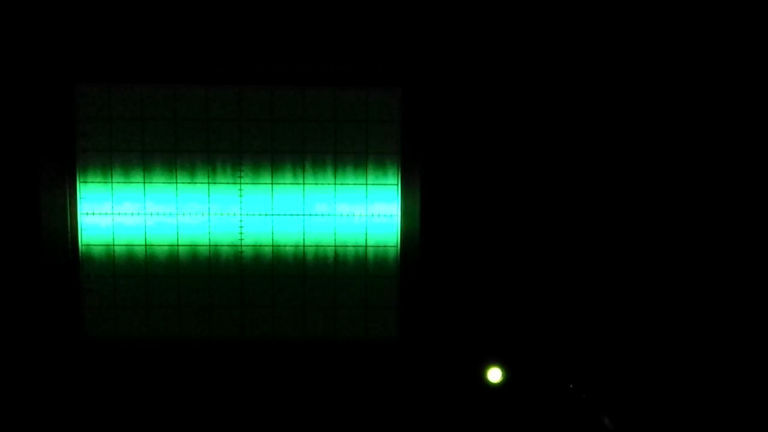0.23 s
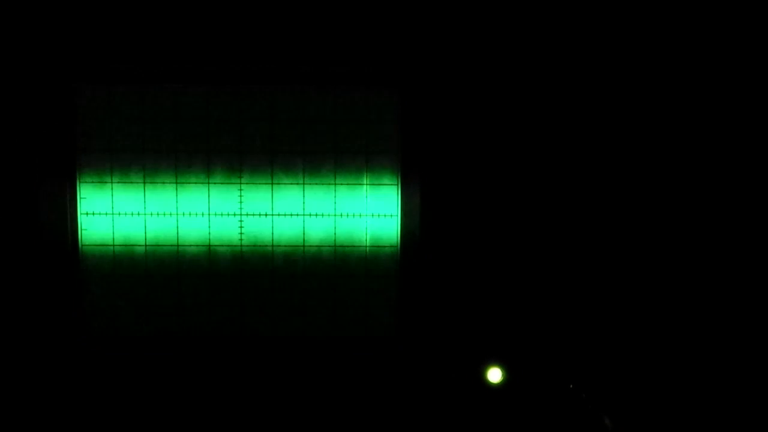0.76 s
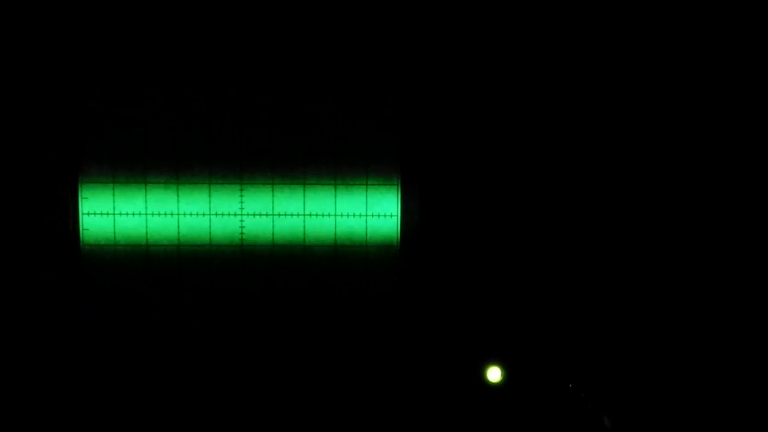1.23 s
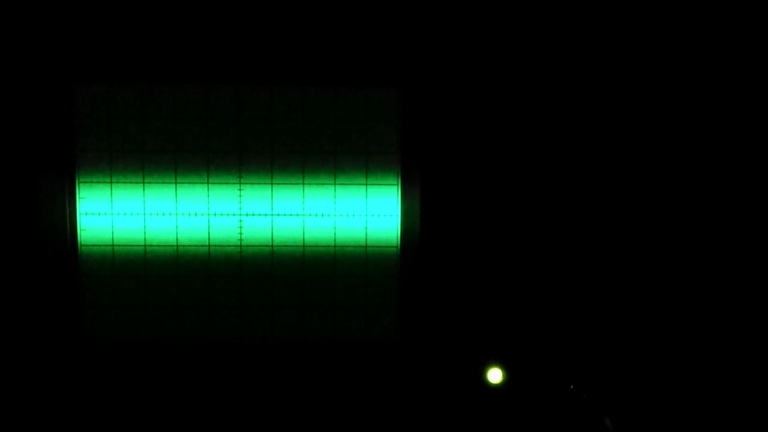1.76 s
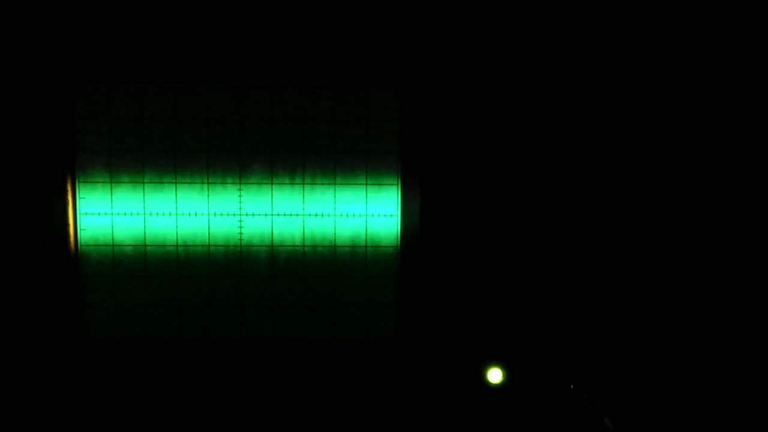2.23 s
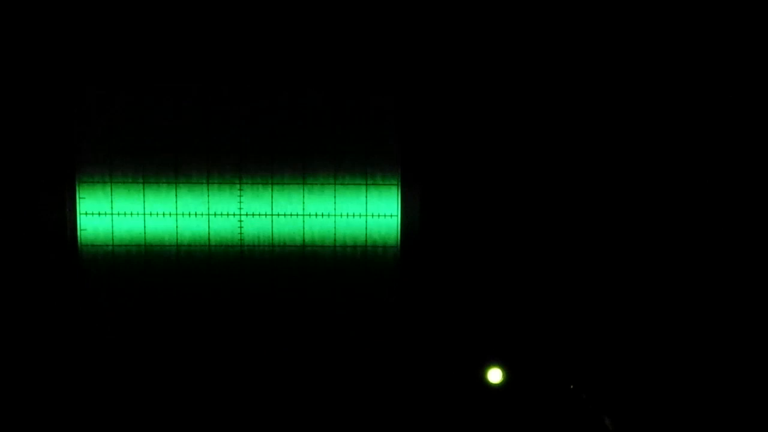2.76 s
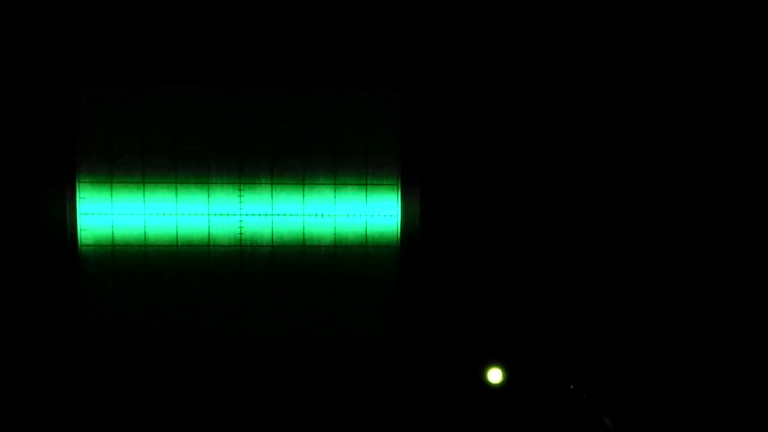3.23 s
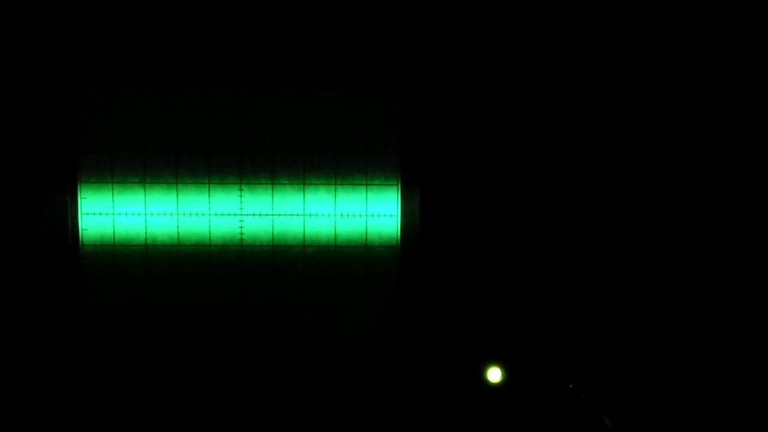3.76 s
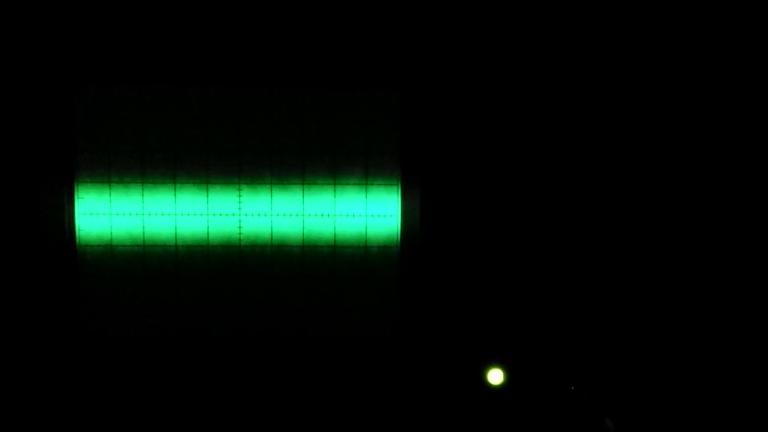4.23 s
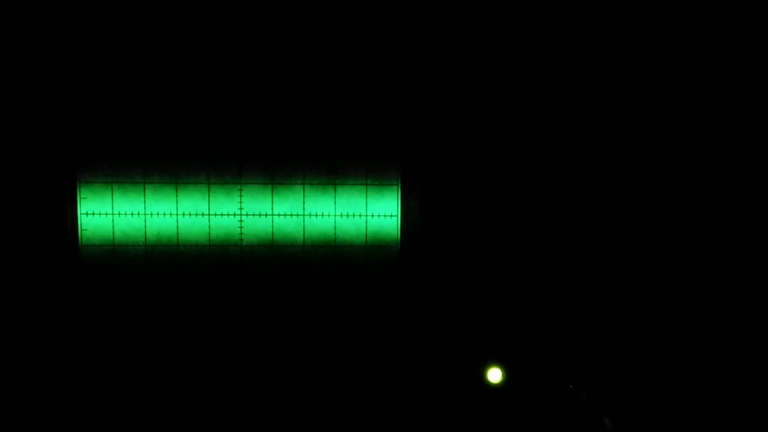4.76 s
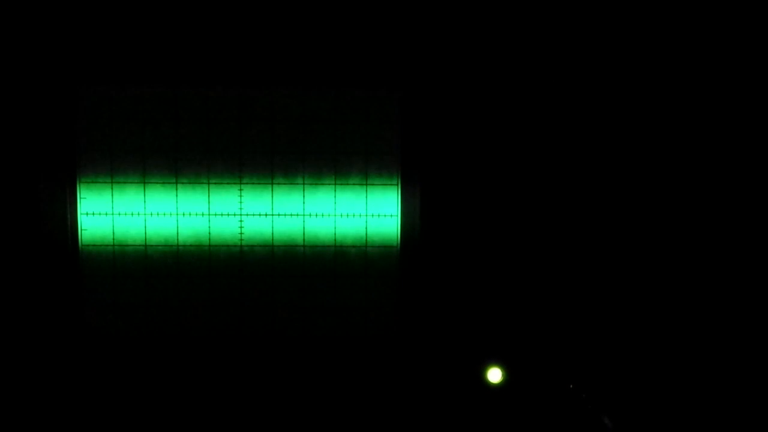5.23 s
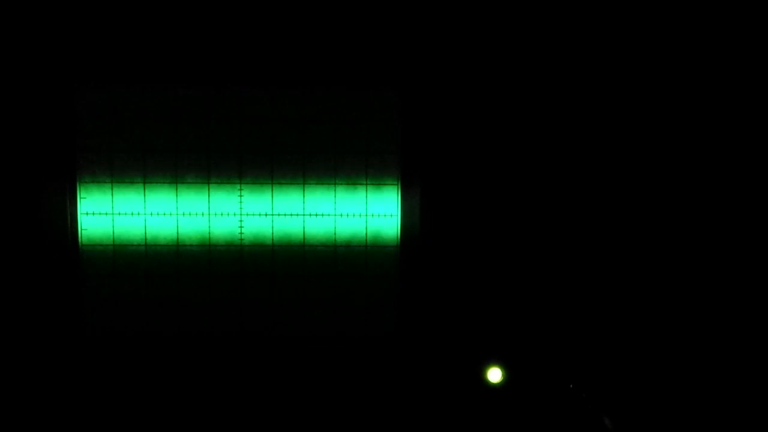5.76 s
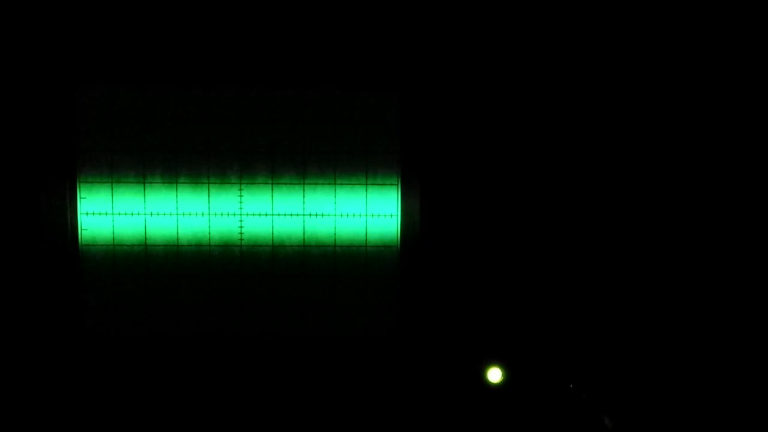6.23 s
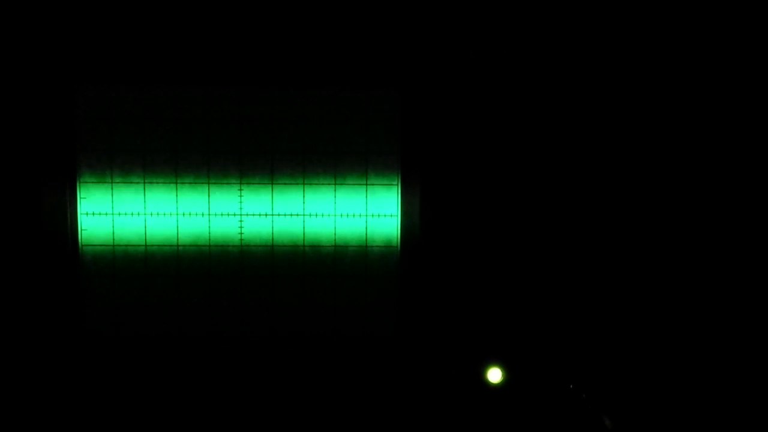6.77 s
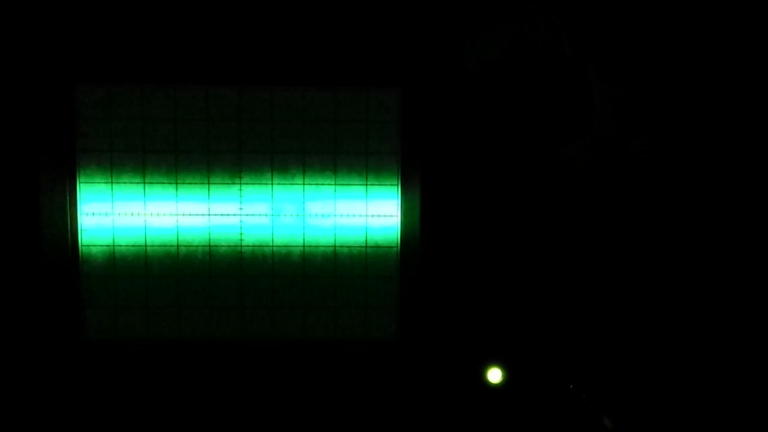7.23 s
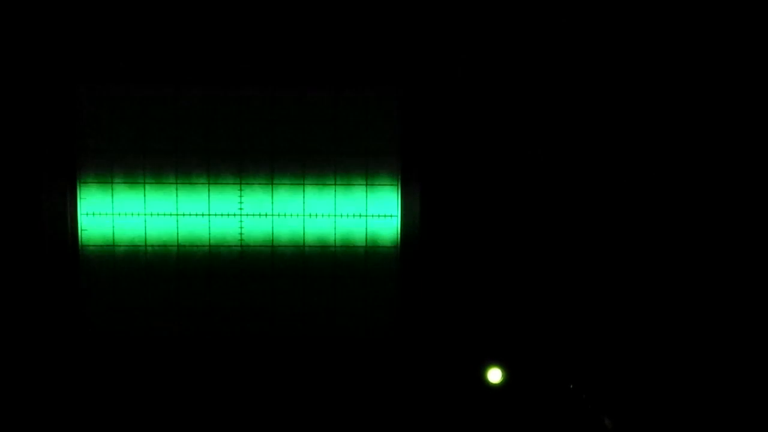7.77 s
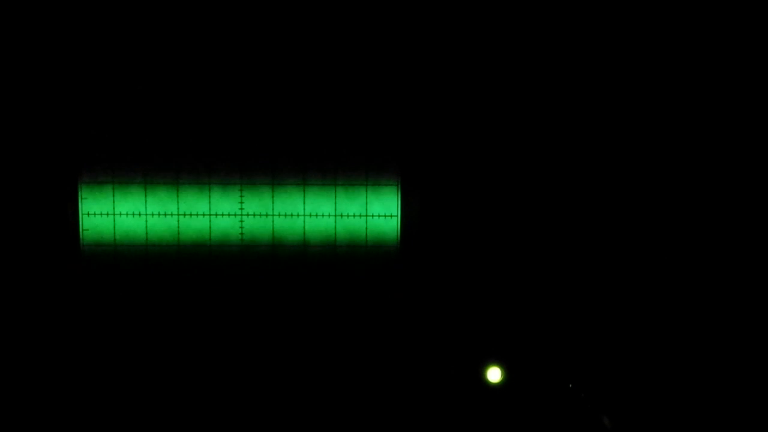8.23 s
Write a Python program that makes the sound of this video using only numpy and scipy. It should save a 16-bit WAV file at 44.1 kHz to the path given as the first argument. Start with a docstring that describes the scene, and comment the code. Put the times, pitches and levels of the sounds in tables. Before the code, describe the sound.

Sharp metallic double-clicks of a bench instrument's knob, singly and in a quick cluster, over faint hiss and rumble, ending with sparse touches and a hollow tock.

```python
"""A stiff rotary switch on an oscilloscope clicks through its detents in a small quiet room.
At each step the spring slides off its notch and snaps home twice, as two quick bursts of noise;
the metal case booms as a set of fading tones and the room answers with fading noise.
Fingers rub and touch the controls, faint tones swell, a small control pings and one hollow tock sounds.
Underneath lie coloured-noise rumble and microphone hiss, and at first a low hum."""
import sys
import numpy as np
from scipy import signal
from scipy.fft import rfft, irfft
from scipy.io import wavfile

SR = 44100
rng = np.random.default_rng(int(sys.argv[2]) if len(sys.argv) > 2 else 0)


def store_wav(level_fs):
    """Save 16-bit WAV to argv[1]."""
    pcm = np.round(np.clip(np.atleast_2d(level_fs), -1, 1) * 32767)
    wavfile.write(sys.argv[1], SR, pcm.T.astype(np.int16))


N = 375368
LENGTH = 32768  # samples in one short sound
AGE = np.arange(LENGTH) / SR  # seconds since that sound began

# In the tables, t60/s is the time to fade by 60 dB, and a colour's level/dB is per Hz, relative.
# Steady background noise, its colour: [f/Hz, level/dB]
BACKGROUND_COLOUR = [(12, -31), (20, -1), (27, -12), (134, 0.5), (241, -5.5), (499, -8.5), (590, -10.5),
                     (825, -11.5), (897, -14.5), (2140, -17.5), (4670, -17), (6720, -7.5), (9670, -19),
                     (14700, -19.5), (16000, -36.5)]
# How alike the background is at left and right: [f/Hz, likeness 0-1]
BACKGROUND_ALIKE = [(60, 0.47), (300, 0.46), (700, 0.3), (1500, 0), (8000, 0.09)]
# Left-right balance of the background: [f/Hz, left minus right/dB]
BACKGROUND_BALANCE = [(100, -2.5), (300, -3.5), (1200, -1), (2500, -1.5), (4400, -3.5), (7500, -12.5),
                      (15000, 3.5)]
# Fingers rubbing on the panel: [start t/s, length/s, level/dB at the middle of the rub]
FINGER_RUBS = [(0.042, 0.22, -64), (.34, .08, -69), (6.043, 0.059, -67), (6.17, 0.055, -64.5),
               (6.281, 0.074, -65), (6.619, 0.093, -67.5)]
# Dull colour of a finger rub: [f/Hz, level/dB]
RUB_COLOUR = [(60, -17), (150, -9), (250, 7), (400, -14), (600, -2), (1100, -16.5), (3000, -27)]
# Steps of the switch, one row each:
# [t/s, snap level/dB, clack level/dB re snap, boom level/dB re snap, brightness/dB per octave]
SWITCH_STEPS = [(0.6357, -29, -14.5, -17.5, -0.2), (0.9362, -28, -15.5, -19.5, -1.1),
                (1.1885, -28.5, -13, -26, 1.8), (1.4439, -29, -12, -29, 1.5),
                (2.0087, -24, -16.5, -25, 1.8), (2.0356, -26.5, -10.5, -17, 1.5),
                (2.0735, -28, -10.5, -22, -1.5), (2.1403, -29, -9.5, -15.5, -1), (2.2491, -31, -8, -17, -2),
                (2.7738, -36.5, -9.5, -12.5, 1), (3.171, -30, -13.5, -19, -1),
                (3.3162, -32, -13.5, -16.5, 2), (3.4908, -31, -14, -19, 2.5),
                (4.3528, -34.5, -14.5, -16.5, 1.5), (4.8551, -37.5, -9, -14, -1.0)]
# Colour of the snap: [f/Hz, level/dB]
SNAP_COLOUR = [(300, -28), (1500, -15.5), (2300, -20.5), (3000, -8.5), (4300, -9.5), (6000, -3.5),
               (6900, 0.5), (8000, 1.5), (9000, -4), (10000, -5.5), (10800, -4.5), (12000, -13.5),
               (14500, -15), (16000, -26)]
# Colour of the front panel's clack: [f/Hz, level/dB]
CLACK_COLOUR = [(100, -24), (230, -0.5), (370, -7.5), (450, -0.5), (680, -0.5), (800, -3.5), (1200, -7),
                (1450, -9), (1680, -6.5), (2000, -12.5), (3500, -14)]
# Colour of the knock that begins the clack: [f/Hz, level/dB]
KNOCK_COLOUR = [(300, -13), (680, -1), (900, -7.5), (1500, 0), (3500, -7.5), (8000, -34)]
# Colour the room gives to the snap's echo: [f/Hz, level/dB]
ECHO_COLOUR = [(1000, 1), (3500, -1), (8000, 0.5), (15000, -2)]
# Low modes (natural tones) of the case and the room: [f/Hz, relative level/dB, t60/s]
BOOM_MODES = [(119.1, -1, 0.67), (144.7, 2, 0.58), (177, -4.5, .45), (209.4, -0.5, 0.52),
              (238.7, -3.5, 0.51), (263.3, -3, .45), (299.3, -13, 0.35), (327, -7, 0.4), (435, -2.5, 0.37),
              (511, -3.5, 0.35), (557, -4, .4), (594, -2.5, 0.23), (625.5, -6, 0.19), (661, -3.5, 0.25),
              (688, -7, 0.25)]
# Ringing tones of the switch's metal parts: [f/Hz, relative level/dB, t60/s]
METAL_MODES = [(1625, -5, .25), (2661, -6, 0.21), (3410, -6, .15), (4100, -5, .2), (6698, -3, 0.16),
               (7205, -5, 0.14), (7500, 6, .2), (7980, 6, 0.11), (9800, -8, .1), (10900, -3, .13)]
# Narrow band that lingers in the metalwork after each step: [f/Hz, level/dB]
LINGER_COLOUR = [(900, -21), (1400, -5.5), (1700, -2), (1950, -17.5), (2600, -27)]
# Left-right balance of the switch: [f/Hz, left minus right/dB]
SWITCH_BALANCE = [(120, -1.2), (500, -2.5), (1300, -1), (2800, 0), (6000, -1), (9000, -6.5), (13000, -7)]
# How fast the room's sound dies: [f/Hz, t60/s]
ROOM_DECAY = [(120, .6), (500, 0.36), (1200, 0.3), (3500, 0.32), (7500, 0.26), (14000, 0.23)]
# How alike the room's sound is at left and right: [f/Hz, likeness 0-1]
ROOM_ALIKE = [(100, 1), (500, .85), (1200, 0.21), (3000, 0.07), (12000, 0)]
# Light touches of the controls: [t/s, low level/dB, middle level/dB, treble level/dB]
LIGHT_TOUCHES = [(1.936, -78, -55.5, -58.5), (4.779, -70.5, -57.5, -59), (5.454, -60.5, -60.5, -57.5),
                 (5.789, -86, -73, -61), (6.825, -68.5, -57, -56.5)]
# Faint whistling tones: [start t/s, length/s, f/Hz, level/dB at the middle of the tone]
FAINT_TONES = [(4.23, 0.12, 818, -72.5), (4.64, 0.16, 544, -76)]
# Thin ping of a small control: [t/s, level/dB]
PING_EVENT = (5.4545, -57.5)
# Modes of the ping: [f/Hz, relative level/dB, t60/s]
PING_TONES = [(1841, 0, .08), (1930, -7, 0.064), (1580, 2, .04), (680, -5, 0.082), (9254, -5, 0.087)]
# Colour of the ping spread through the room: [f/Hz, level/dB]
PING_ROOM = [(300, -6), (750, -2), (1100, -10), (1850, 1), (2400, -16), (8000, -20)]
# Hollow tock of a small switch: [t/s, level/dB]
TOCK_EVENT = (6.3628, -30.8)
# Modes of the tock: [f/Hz, relative level/dB, t60/s]
TOCK_TONES = [(255, -25.5, 0.38), (328.8, -24, 0.37), (990, -13.5, .11), (1110, 1.5, 0.015),
              (1260, -15, 0.064), (1430, -6, .025), (1720, -17, .025), (2700, -17, 0.034),
              (4156, -17, 0.04), (7130, -13, 0.028)]
# Colour of the tock spread through the room: [f/Hz, level/dB]
TOCK_ROOM = [(60, -30), (150, -10.5), (300, -6), (600, -18.5), (850, -3.5), (1050, -2), (1450, -7.5),
             (2000, -17.5), (2750, -15), (3600, -19.5), (7300, -13), (9000, -27), (15000, -38)]

BACKGROUND_DB = -62.45  # before the slow level changes below
# the rumble is the low part of the background; it starts a little raised and settles
RUMBLE_EDGE_HZ, RUMBLE_START_DB, SETTLE_DB_PER_S = 1100, 3, 0.4
# the background sinks in one long shallow dip
DIP_AT_S, DIP_WIDTH_S, RUMBLE_DIP_DB, HISS_DIP_DB = 4.6, 1.5, 4, 3
HUM_HZ, HUM_DB = 71.6, -67.5
HUM_RISE_S, HUM_HOLD_UNTIL_S, HUM_FADE_DB_PER_S = 0.2, 1.1, 4.8
RECORDER_EDGE_HZ = 15450


def amp(db):
    """Turns decibels into a gain."""
    return 10 ** (np.asarray(db) / 20)


def read(points, hz):
    """Reads a table at any frequency, along a log-frequency axis."""
    f, value = np.transpose(points)
    return np.interp(np.log(hz + 1), np.log(f + 1), value)


def evened(x, count=None):
    """Scales a sound to rms 1, judged over its first count samples if given."""
    return x / np.sqrt(np.mean(x[..., :count] ** 2) + 1e-20)


def panned(db):
    """Left and right gains for a left-minus-right balance in dB, keeping the mean power."""
    gains = amp(np.array([db, -db]) / 2)
    return (gains / np.sqrt(np.mean(gains ** 2, 0))).reshape(2, -1)


def add(mix, s, sound):
    """Mixes a sound in, starting at s seconds."""
    part = mix[:, round(s * SR):][:, :sound.shape[1]]
    part += sound[:, :part.shape[1]]


def coloured(x, points):
    """Colours a sound without smearing it ahead of its start (minimum phase), so attacks stay sharp."""
    hz = abs(np.fft.fftfreq(LENGTH, 1 / SR))
    log_gain = np.log(amp(read(points, hz)))
    response = np.exp(np.conj(signal.hilbert(log_gain)))
    return irfft(rfft(x) * response[:LENGTH // 2 + 1])


def noise_pair(points, alike, size):
    """Spectra of coloured noise at two microphones: the right one shares part of the left one's noise."""
    hz = np.fft.rfftfreq(size, 1 / SR)
    left, other = rfft(rng.standard_normal((2, size)))
    same = np.clip(read(alike, hz), -1, 1)
    right = same * left + np.sqrt(1 - same ** 2) * other
    return hz, np.array([left, right]) * amp(read(points, hz))


def room_noise(points):
    """Steady coloured noise, as alike at left and right as the room makes it."""
    return evened(irfft(noise_pair(points, ROOM_ALIKE, LENGTH)[1]))


def reverberant(points, rise):
    """A blow's spread-out sound: noise that builds up, then dies at the room's rate in each band."""
    hz, t, bands = signal.stft(room_noise(points), SR, nperseg=256)
    t60 = read(ROOM_DECAY, hz)[:, None]
    tail = signal.istft(bands * 1e-3 ** (t / t60), SR)[1]
    return tail[:, :LENGTH] * (1 - np.exp(-AGE / rise))


def burst(points, rise, decay):
    """A dense cluster of resonances, made as noise that swells and dies (times in s)."""
    return room_noise(points) * (1 - np.exp(-AGE / rise)) * np.exp(-AGE / decay)


def ringing(modes, scatter_db, spread):
    """Fading tones, struck a little differently each time; spread is the phase scatter between sides/rad."""
    out = np.zeros((2, LENGTH))
    for hz, db, t60 in modes:
        phase = 2 * np.pi * rng.random() + spread * rng.standard_normal((2, 1))
        mode = np.exp((2j * np.pi * hz - np.log(1000) / t60) * AGE)
        level = amp(db + scatter_db * rng.standard_normal())
        out += level * (np.exp(1j * phase) * mode).imag
    return out


def background():
    """Noise split into rumble and hiss; both sink in one long shallow dip, and the rumble slowly settles."""
    t = np.arange(N) / SR
    hz, spectra = noise_pair(BACKGROUND_COLOUR, BACKGROUND_ALIKE, N)
    balance = panned(read(BACKGROUND_BALANCE, hz))
    noise = amp(BACKGROUND_DB) * evened(irfft(spectra * balance, N))
    rumble = irfft(rfft(noise) / (1 + (hz / RUMBLE_EDGE_HZ) ** 2), N)
    hiss = noise - rumble
    dip = np.exp(-((t - DIP_AT_S) / DIP_WIDTH_S) ** 2)
    rumble_db = RUMBLE_START_DB - SETTLE_DB_PER_S * t - RUMBLE_DIP_DB * dip
    return rumble * amp(rumble_db) + hiss * amp(-HISS_DIP_DB * dip)


def hum():
    """A faint low sine tone that swells, holds and dies away."""
    t = np.arange(N) / SR
    level_db = HUM_DB - HUM_FADE_DB_PER_S * np.maximum(t - HUM_HOLD_UNTIL_S, 0)
    level = amp(level_db) * (1 - np.exp(-t / HUM_RISE_S))
    return level * np.sqrt(2) * np.sin(2 * np.pi * HUM_HZ * t)


def finger_rubs():
    """Skin rubbing on the panel makes dull friction noise that swells and fades."""
    out = np.zeros((2, N))
    for s, length, db in FINGER_RUBS:
        swell = np.sin(np.pi * np.minimum(AGE / length, 1))
        add(out, s, amp(db) * room_noise(RUB_COLOUR) * swell)
    return out


def slide(lead=0.0039, growth=0.0039):
    """The spring scrapes off the crest of the cam: noise that grows until the snap, lead seconds later."""
    force = np.exp(-abs(AGE - lead) / growth) * (AGE < lead) * rng.standard_normal((2, LENGTH))
    return lead, amp(-18) * evened(coloured(force, SNAP_COLOUR), count=132)


def snap(tilt_db, gap=0.0027, decay=0.0019, second_decay=0.0024, rattle_db=-8, rattle_decay=0.0084,
         first_pan_db=-4, second_pan_db=3.5, uneven_db=1.9):
    """The spring hits its notch, hits again a moment later, and the mechanism rattles out (times in s)."""
    first = np.exp(-AGE / decay) * panned(first_pan_db)
    late = AGE - gap * rng.uniform(0.85, 1.15)  # time since the second hit
    second_db = rng.uniform(-3, 3)
    second = amp(second_db) * (late > 0) * np.exp(-abs(late) / second_decay) * panned(second_pan_db)
    rattle = amp(rattle_db) * np.exp(-AGE / rattle_decay)
    strength = np.sqrt(first ** 2 + second ** 2 + rattle ** 2)
    force = strength * rng.standard_normal((2, LENGTH))
    # every snap has a slightly different colour; the tilt pivots at 7000 Hz
    hz = np.geomspace(300, 16000, 36)
    octaves = np.log2(np.maximum(hz, 2000) / 7000)
    uneven = uneven_db * rng.standard_normal(len(hz))
    colour = read(SNAP_COLOUR, hz) + tilt_db * octaves + uneven
    return evened(coloured(force, np.transpose([hz, colour])), count=353)


def snap_in_room(tilt_db):
    """The direct snap plus its echo, made by spreading the snap through the room's fading noise."""
    direct = snap(tilt_db)
    room = reverberant(ECHO_COLOUR, rise=0.0022)
    echo = signal.fftconvolve(direct[:, :2048], room, axes=1)[:, :LENGTH]
    return direct + amp(-11.5) * evened(echo, count=1024)


def metal_ring():
    """The metal parts ring as fading tones, and a narrow band swells and lingers after them."""
    tones = ringing(METAL_MODES, scatter_db=5, spread=1.1)
    return amp(-20) * tones + amp(-34.5) * burst(LINGER_COLOUR, rise=0.069, decay=0.17)


def panel_clack(panel):
    """The front panel gives a short knock, then an answer that is partly the same at every step."""
    knock = amp(4) * burst(KNOCK_COLOUR, rise=0.0025, decay=0.007)
    return knock + panel + amp(-1) * reverberant(CLACK_COLOUR, rise=0.0025)


def case_boom(scatter_db, spread, rise):
    """The case and the room boom in their low modes, building up over rise seconds."""
    return ringing(BOOM_MODES, scatter_db, spread) * (1 - np.exp(-AGE / rise))


def detents():
    """Each step of the switch joins slide, snap, ringing metal, panel clack and case boom."""
    out = np.zeros((2, N))
    panel = reverberant(CLACK_COLOUR, rise=0.0025)  # the part that repeats at every step
    for s, db, clack_db, boom_db, tilt_db in SWITCH_STEPS:
        lead, scrape = slide()
        add(out, s - lead, amp(db) * scrape)
        clack = amp(clack_db) * panel_clack(panel)
        boom = amp(boom_db) * case_boom(scatter_db=2.5, spread=0.28, rise=0.017)
        add(out, s, amp(db) * (snap_in_room(tilt_db) + metal_ring() + clack + boom))
    balance = panned(read(SWITCH_BALANCE, np.fft.rfftfreq(N, 1 / SR)))
    return irfft(rfft(out) * balance, N)


def light_touches():
    """Fingers and lighter controls tick against the same case, with a low, a middle and a treble part."""
    out = np.zeros((2, N))
    for s, low_db, middle_db, treble_db in LIGHT_TOUCHES:
        low = amp(low_db) * case_boom(scatter_db=1.5, spread=0.3, rise=0.02)
        middle = amp(middle_db) * reverberant(CLACK_COLOUR, rise=0.0005)
        tick = snap(tilt_db=-4) + amp(-11) * reverberant(SNAP_COLOUR, rise=0.0051)
        add(out, s, low + middle + amp(treble_db) * tick)
    return out


def faint_tones():
    """Faint pure tones that swell and fade."""
    out = np.zeros((2, N))
    for s, length, hz, db in FAINT_TONES:
        swell = np.sin(np.pi * np.minimum(AGE / length, 1))
        tone = np.sqrt(2) * np.sin(2 * np.pi * hz * AGE)
        add(out, s, amp(db) * swell * tone * panned(-1.5))
    return out


def small_switch(event, modes, tail, room_db):
    """A small switch or control rings in its own fading tones, and the room answers with noise."""
    s, db = event
    direct = ringing(modes, scatter_db=1.0, spread=0.3) * (1 - np.exp(-AGE / 0.00034))
    room = amp(room_db) * reverberant(tail, rise=0.002)
    out = np.zeros((2, N))
    add(out, s, amp(db) * (direct + room) * panned(-3.2))
    return out


def scene():
    """Adds up all the sources at the two microphones."""
    ping = small_switch(PING_EVENT, PING_TONES, PING_ROOM, room_db=-4)
    tock = small_switch(TOCK_EVENT, TOCK_TONES, TOCK_ROOM, room_db=-14.5)
    quiet = background() + hum()
    return quiet + finger_rubs() + detents() + light_touches() + faint_tones() + ping + tock


def record(dry):
    """The recorder's steep band limit removes the highest treble."""
    low_pass = signal.firwin(255, RECORDER_EDGE_HZ, window=("kaiser", 9), fs=SR)
    return signal.oaconvolve(dry, low_pass[None], "same", axes=1)


dry = scene()
out = record(dry)
store_wav(out)
```